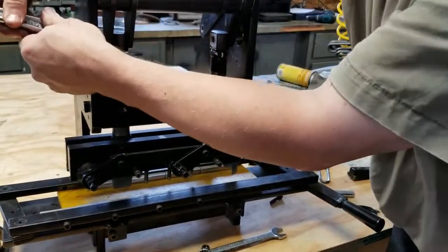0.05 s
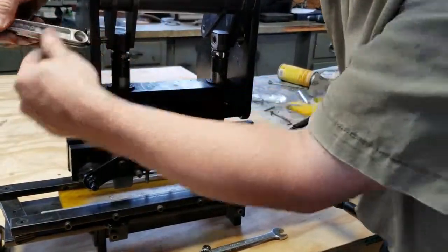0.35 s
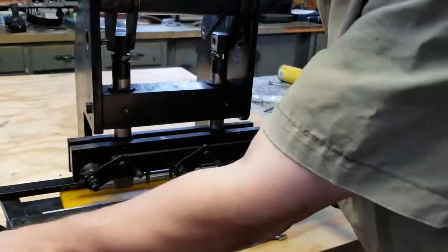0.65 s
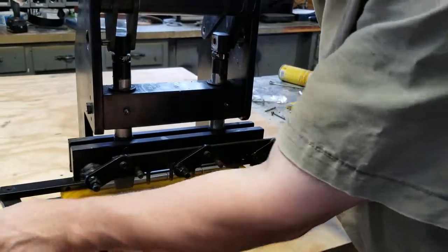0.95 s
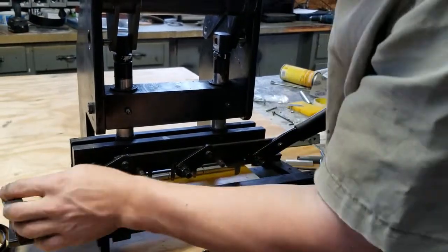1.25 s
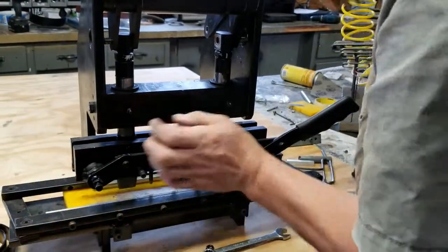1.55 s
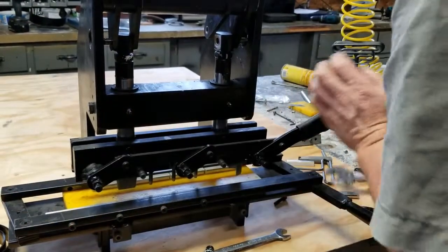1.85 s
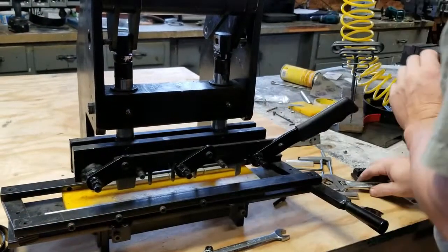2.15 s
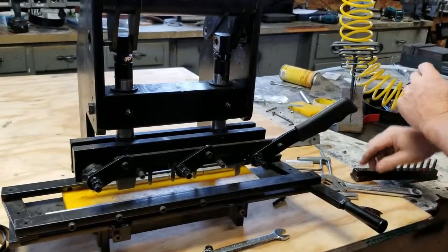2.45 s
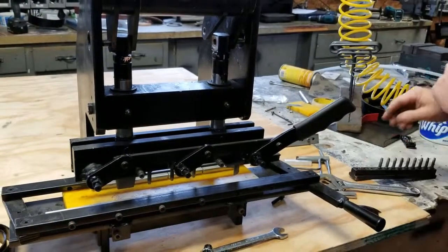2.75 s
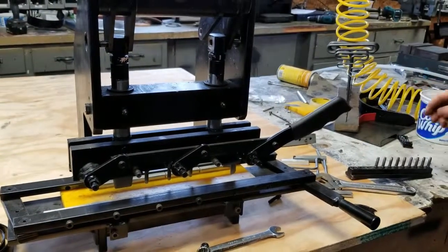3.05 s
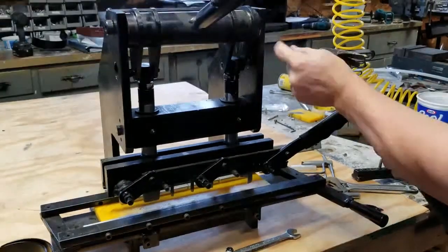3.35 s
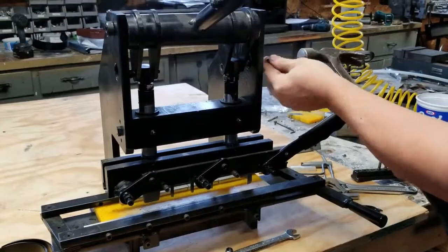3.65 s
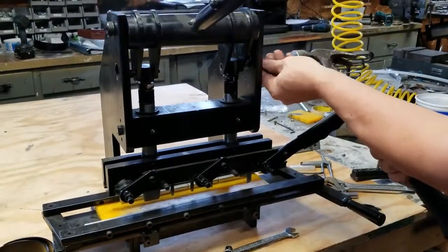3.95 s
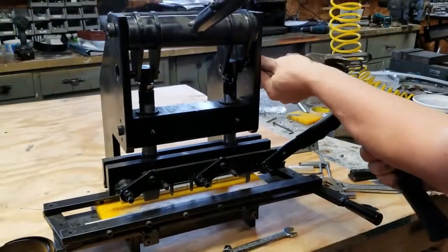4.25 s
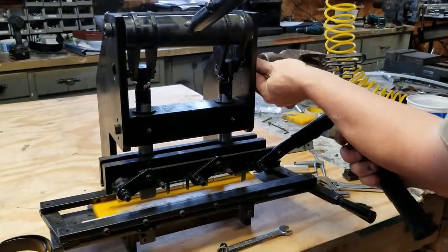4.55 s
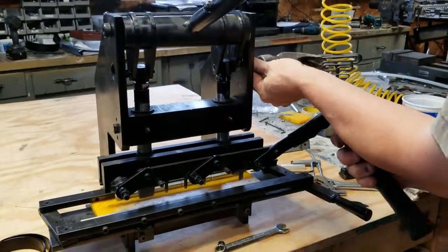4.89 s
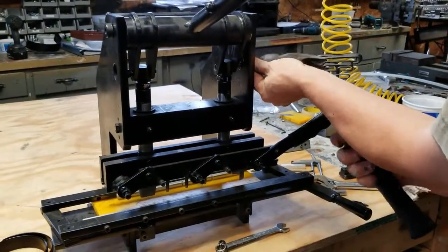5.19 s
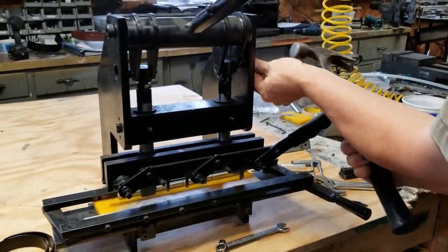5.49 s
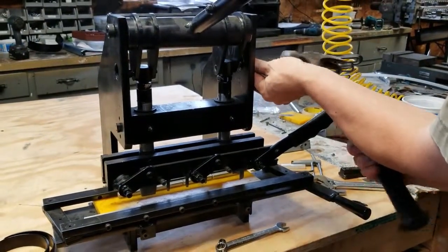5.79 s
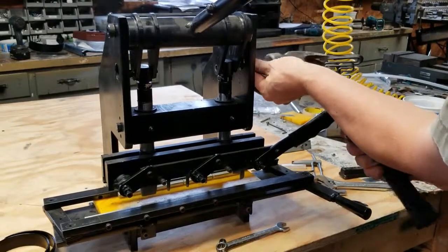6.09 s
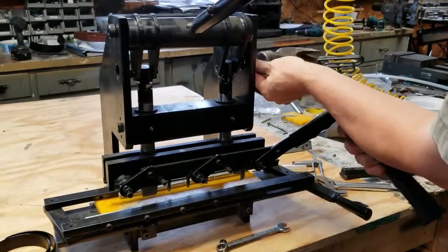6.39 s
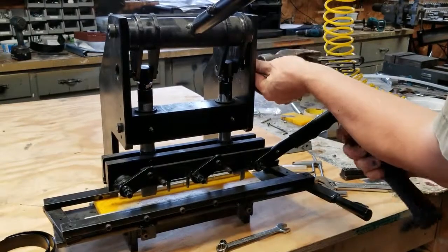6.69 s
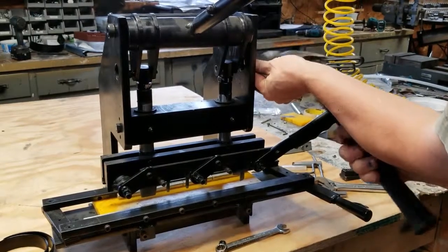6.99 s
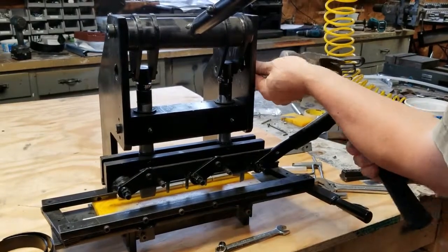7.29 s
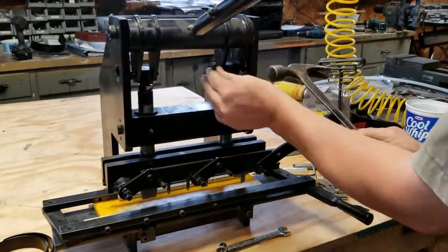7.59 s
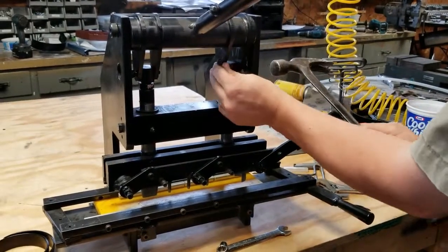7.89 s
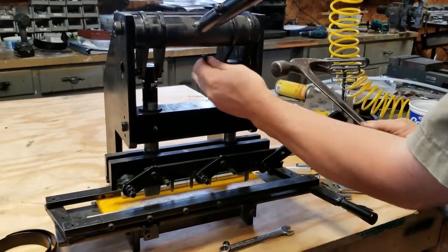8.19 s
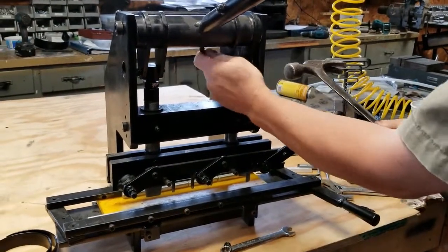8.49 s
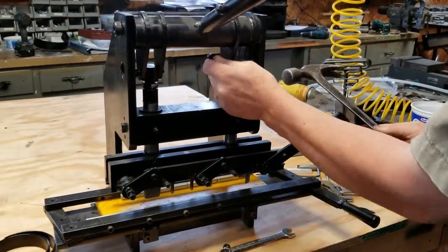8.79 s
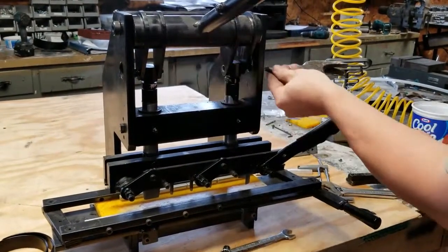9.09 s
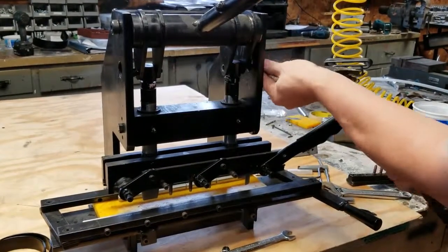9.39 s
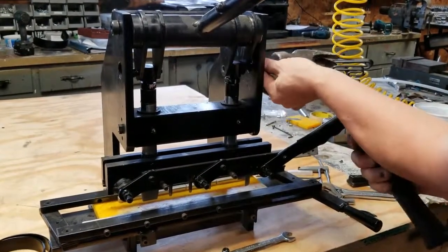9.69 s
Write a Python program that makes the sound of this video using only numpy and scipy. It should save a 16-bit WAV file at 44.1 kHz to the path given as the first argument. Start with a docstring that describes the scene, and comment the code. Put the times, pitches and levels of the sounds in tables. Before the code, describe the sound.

In a workshop with a steady low machine hum, steel tools are put down on a wooden bench with a high clink and dull knocks. A sharp click on the left is followed by a bump and a brief dropout. Then a hammer taps a pin through a steel frame about eight times, each blow ringing briefly. A few light ticks and one softer tap follow, while a faint hiss comes and goes.

```python
"""A hammer taps a pin through the frame of a steel gang punch on a wooden workbench.
Each blow rings the frame and the workshop; before the blows, tools are put down with a clink.
A machine hums behind and a hiss comes and goes. The main blows are about equally hard, but gain
control turns everything down a step with each, and recovers a second after the last.
Before the hammering, the sound clicks once on the left, then bumps and drops out for a moment."""
import sys
import numpy as np
from scipy import signal
from scipy.fft import rfft, irfft
from scipy.io import wavfile
from scipy.ndimage import uniform_filter1d

SR = 44100
rng = np.random.default_rng(int(sys.argv[2]) if len(sys.argv) > 2 else 0)


def waveform_to_disk(signal):
    """Save audio, clipped to [-1, 1], as 16-bit WAV at the path in sys.argv[1]."""
    frames = np.transpose(np.atleast_2d(signal))
    scaled = np.clip(frames, -1, 1) * 32767
    samples = np.round(scaled).astype(np.int16)
    wavfile.write(sys.argv[1], SR, samples)


N = 433944

# The hammer landing on the pin. Each row: start in seconds, level in dB, treble in dB, crack in dB,
# clank pitch in Hz, clank in dB, ring pitch in Hz, ring in dB.
HAMMER_BLOWS = [(4.543, -27.5, 2, 4, 1260, 8.5, 1330, -6), (4.550, -27.5, -5, 12.5, 3120, 15, 5860, -10),
                (4.872, -11.5, -6, 1, 1410, -8.5, 4080, -31), (4.893, -20.5, 4, 1, 1430, 10, 2520, -3),
                (5.221, -11, -0.5, 8.5, 1836, 7, 12100, -24), (5.569, -11, 4.5, -12, 4060, -2, 2530, -24),
                (5.929, -10.5, 3, 10.5, 1810, 5, 5780, -13), (6.284, -9.5, 6, 7.5, 3770, 0, 5850, -14),
                (6.653, -11.5, 13, 8.5, 1747, 3.5, 6030, -10.5),
                (7.022, -12, 8.5, 8.5, 1770, -2, 4010, -11.5), (9.739, -21, -8, 4.5, 1940, 2, 2370, -22)]
# The dense body of the steel frame. Each row: frequency in Hz, level in dB.
FRAME_BODY = [(40, -2), (130, 0), (250, 1.5), (390, 3), (620, 2.5), (950, 0), (1500, 1), (2600, 1.5),
              (3300, -6), (4200, -3.5), (5900, -14), (6700, -14), (10000, -18), (14500, -16)]
# The clear tones of the frame, then of the pin. Each row: pitch in Hz, level in dB, t60 in seconds.
FRAME_MODES = [(199, -24, 0.33), (311.4, -20, 1), (364.6, -13.5, 0.55), (414.7, -18.5, 0.59),
               (655, -27, 0.51), (1325, -13.5, 0.19), (1447, -14, 0.49), (1707, -34.5, .4),
               (1773, -22, 0.49), (2410, -32, 0.16), (2497, -22.5, 0.81), (2610, -14.5, 0.25),
               (4012, -9.5, 0.24), (4800, -28.5, 0.25), (5690, -16.5, 0.32), (5580, -23, 0.14),
               (11200, -26, .3)]
PIN_MODES = [(8370, -13, .45), (8580, -12, .45), (13480, -4, .3), (13640, -1, .34), (13800, -7, .26)]


def hammer(tick_db=3, snap_db=-1, clack_db=4, pin_free_s=6.65, pin_fall_db_per_s2=51):
    """Steel on steel ticks, snaps and clacks, and the frame rings; the pin rings most when freest."""
    out = np.zeros((2, N))
    for start, db, treble_db, crack_db, clank_hz, clank_db, ring_hz, ring_db in HAMMER_BLOWS:
        pin_db = 0.5 - pin_fall_db_per_s2 * (start - pin_free_s) ** 2
        pin = [(hz, mode_db + pin_db, t60) for hz, mode_db, t60 in PIN_MODES]
        modes = FRAME_MODES + [(ring_hz, ring_db, 0.45)] + pin
        frame = strike(FRAME_BODY, modes, treble_db, crack_db - 2, bass_db=-4.5, crack_s=0.0015,
                       body_s=0.029, room_db=-1, clank_hz=clank_hz, clank_db=clank_db)
        tick = amp(tick_db + treble_db) * snap(hz=14900, fade_s=0.0028, sharpness=3.6)
        crack = amp(snap_db + crack_db) * snap(hz=4200, fade_s=0.0017, sharpness=1.4)
        clack = amp(clack_db) * snap(hz=clank_hz, fade_s=0.0022, sharpness=22)
        add(out, start, amp(db) * frame)
        add(out, start, amp(db) * (tick + crack + clack))
    return out


def snap(hz, fade_s, sharpness, size=1024):
    """The first wave of a contact: a few milliseconds of resonance, dry and mono."""
    t, freqs = np.arange(size) / SR, np.fft.rfftfreq(size, 1 / SR)
    detune = freqs / hz - hz / (freqs + 1)
    band = irfft(rfft(rng.standard_normal(size)) / (1 + (sharpness * detune) ** 2), size)
    fade = np.exp(-t / fade_s) * (1 - np.exp(-t / 0.0002))
    return np.outer([1, 1], unit(band * fade) * np.sqrt(np.mean(fade ** 2)))


# The workshop's reverb tail. Each row: frequency in Hz, t60 in seconds.
ROOM_DECAY = [(100, 0.69), (300, 0.58), (700, 0.8), (1900, 0.58), (4800, 0.57), (12800, 0.4)]


def strike(body, modes, treble_db, crack_db, bass_db, crack_s, body_s, room_db,
           clank_hz=1000, clank_db=0, size=28672):
    """One hit: a crack, a short dense ring, the room's tail and any clear modes on top."""
    t, hz = np.arange(size) / SR, np.fft.rfftfreq(size, 1 / SR)
    band_hz, frame_s, bands = signal.stft(stereo_noise(size), SR, nperseg=256)
    room_fade = amp(-60 * frame_s / curve(ROOM_DECAY, band_hz)[:, None])
    tail = signal.istft(bands * room_fade, SR, nperseg=256)[1][:, :size]
    direct = stereo_noise(size) * np.exp(-t / body_s)
    burst = stereo_noise(size) * np.exp(-t / crack_s)
    crack = signal.lfilter([1, -1], [1, -0.88], burst)  # too short to move the bass
    # a heavy hit carries more bass, a hard contact more treble
    tilt_db = bass_db / (1 + (hz / 650) ** 2) + treble_db * (1 - 1 / (1 + (hz / 6500) ** 4))
    peak_db = clank_db / (1 + ((hz / clank_hz - 1) / 0.073) ** 2)
    tone = unit(amp(curve(body, hz) + ripple(hz))) * amp(tilt_db + peak_db)
    impact = colour(amp(crack_db) * crack + direct + amp(room_db) * tail, tone)
    attack = 1 - np.exp(-t / 0.00018)
    return (impact + ringing(modes, size)) * attack


def ripple(hz, spacing_hz=70, depth_db=4.2):
    """Many small modes: uneven peaks and dips, in dB, that differ with the spot that is hit."""
    grid = np.arange(0, SR / 2, spacing_hz)
    return depth_db * np.interp(hz, grid, rng.standard_normal(len(grid))) * hz / (hz + 2000)


def ringing(modes, size, spread=0.004, min_width_hz=7):
    """Each mode is a tight cluster of partials, so it beats and shimmers as it dies."""
    t, hz = np.arange(size) / SR, np.fft.rfftfreq(size, 1 / SR)
    noise_spectrum = rfft(stereo_noise(size))
    out = np.zeros((2, size))
    for mode_hz, db, t60 in modes:
        fade = np.exp(-np.log(1000) * t / t60)
        width_hz = min_width_hz + spread * mode_hz
        cluster = irfft(noise_spectrum / (1 + ((hz - mode_hz) / width_hz) ** 2), size)
        out += amp(db) * unit(cluster * fade) * np.sqrt(np.mean(fade ** 2))
    return out


# Tools landing. Each row: start in seconds, level in dB, treble in dB, crack in dB,
# ring pitch in Hz, ring in dB.
TOOL_CLINKS = [(1.929, -16, -2, 2.5, 12800, -17), (2.130, -30.5, 2.5, 14.5, 11690, -3),
               (2.144, -21.5, 1, 7.5, 4720, -7.5), (2.148, -31, 23.5, 0.5, 15600, -5),
               (2.158, -27.5, -0.5, -8, 11690, -3), (2.169, -42, 9, 8, 4560, -3)]
# The bright body of a tool. Each row: frequency in Hz, level in dB.
TOOL_BODY = [(60, -16), (300, -10), (600, 0.5), (1000, 2), (1800, -1), (4400, -3.5), (6200, -12.5),
             (9500, -14.5), (11000, -10), (13600, -9.5), (15600, -5.5)]
# Its clear tones. Each row: pitch in Hz, level in dB, t60 in seconds.
TOOL_MODES = [(631, -9, 0.14), (1050, -20.5, .3), (2610, -17.5, 0.42), (7700, -36, 0.37), (9600, -40, 0.2),
              (11200, -6, 0.23), (11800, -14.5, 0.3), (12600, -25, 0.42), (14040, -18, .16),
              (15550, -31, 0.17)]


def tool_clinks():
    """Steel tools are put down and ring with a high clink."""
    return hits(TOOL_CLINKS, TOOL_BODY, TOOL_MODES, ring_t60=0.51,
                bass_db=-2, crack_s=0.0045, body_s=0.024, room_db=-5)


# Thuds on the bench. Each row: start in seconds, level in dB, treble in dB, crack in dB,
# ring pitch in Hz, ring in dB.
BENCH_KNOCKS = [(.001, -46, -2, -7, 180, 16), (.215, -36.5, -4, -9, 379, 2.5), (.250, -38.5, 7, -9, 179, 5),
                (2.144, -30, -3, 2.5, 958, -1.5), (2.371, -28.5, -6, 7.5, 710, -8),
                (2.775, -39.5, -12.5, -10, 356, 3.5), (4.545, -29, -9.5, -2.5, 420, 2),
                (4.893, -26.5, -8, -7, 390, 2), (5.226, -31.5, -5, 1, 518, 0.5),
                (9.745, -30.5, -10, -5, 414.5, 1)]
# The dark body of the wood. Each row: frequency in Hz, level in dB.
BENCH_BODY = [(50, -26.5), (110, -2.5), (220, 4.5), (450, 2), (1000, -7), (2000, -11), (5000, -31),
              (15000, -26.5)]


def bench_knocks():
    """The wood knocks dully as things are put down and the punch jumps under the hammer."""
    return hits(BENCH_KNOCKS, BENCH_BODY, [], ring_t60=0.28,
                bass_db=4.5, crack_s=0.0046, body_s=0.038, room_db=-5.5)


# Small steel ticks. Each row: start in seconds, level in dB, treble in dB, crack in dB,
# ring pitch in Hz, ring in dB.
STEEL_TICKS = [(.001, -43.5, 20, -7, 7160, -4), (.004, -48.5, 2, -9, 2680, 3),
               (.107, -55, 24.5, 16, 7200, -3), (.958, -56.5, 27, 16.5, 4700, 0),
               (1.003, -54.5, 27, 17, 4640, 4), (1.291, -53, 16, 16, 4840, -10),
               (1.471, -51, 11, 11, 8450, -10), (1.630, -44, 13, 0, 12470, -10),
               (2.384, -51.5, 23, 8, 15600, 0), (3.262, -48.5, 19, -3, 13000, -13),
               (7.915, -33.5, 0.5, 17.5, 1780, -11), (8.032, -39, -2, 12, 1600, -1),
               (8.549, -43, -10, 3, 1310, -3), (8.560, -38.5, 1, 16.5, 2480, -3)]
# The thin body of a light touch. Each row: frequency in Hz, level in dB.
TICK_BODY = [(100, -25), (700, -1.5), (1300, 6.5), (2700, 3), (4500, -2.5), (7000, -15.5), (15000, -20)]


def steel_ticks():
    """Light touches of steel on steel snap and are gone."""
    return hits(STEEL_TICKS, TICK_BODY, [], ring_t60=0.35,
                bass_db=1, crack_s=0.0028, body_s=0.009, room_db=1)


def hits(rows, body, modes, ring_t60, **voicing):
    """A run of hits on one kind of object, each with a ringing mode of its own."""
    out = np.zeros((2, N))
    for start, db, treble_db, crack_db, ring_hz, ring_db in rows:
        t60 = ring_t60 * curve(ROOM_DECAY, ring_hz) / curve(ROOM_DECAY, 4000)  # highs die sooner
        hit = strike(body, modes + [(ring_hz, ring_db, t60)], treble_db, crack_db, **voicing)
        add(out, start, amp(db) * hit)
    return out


def pop(hz, width_s, db, size=1024):
    """A dry swing of pressure that lasts a cycle or two."""
    t = np.arange(size) / SR
    envelope = (t / width_s) * np.exp(1 - t / width_s)
    return amp(db) * envelope * np.sin(2 * np.pi * hz * t)


# Swells of the hiss. Each row: time when fully up in seconds, hold in seconds, level in dB.
HISS_SWELLS = [(.25, .02, -47.5), (.8, .02, -49), (1.224, .03, -48.5), (1.683, .02, -49),
               (2.68, 0.052, -44), (4.013, 1.02, -31.5), (7.15, 0.23, -33), (8.28, 0.56, -53.5),
               (8.884, 0.14, -31.5), (9.45, .04, -57)]
# Its airy colour. Each row: frequency in Hz, level in dB.
HISS_COLOUR = [(400, -32), (1200, -4.5), (2500, 1), (4500, 0), (9000, -1.5), (12500, 4), (15700, 4)]


def hiss(rest_db=-59, rise_s=0.17, fall_db_per_s=111, flutter_db=0.83):
    """A faint bright hiss; each swell rises smoothly, holds and dies away."""
    t = np.arange(N) / SR
    gain = amp(rest_db)
    for full_s, hold_s, db in HISS_SWELLS:
        rise = np.cos(np.pi / 2 * np.clip((full_s - t) / rise_s, 0, 1)) ** 2
        fall_db = fall_db_per_s * np.maximum(t - full_s - hold_s, 0)
        gain = np.hypot(gain, rise * amp(db - fall_db))
    return wash(HISS_COLOUR) * gain * amp(flutter_db * drift(rate_hz=25))


# The motor's drone. Each row: pitch in Hz, level in dB.
MOTOR_TONES = [(50, -64.5), (75.4, -59.5), (143, -53), (155.5, -50), (279.9, -46), (307.5, -49),
               (463, -55.5), (559.9, -58), (717, -62)]
# The low bed of moving air. Each row: frequency in Hz, level in dB.
AIR_COLOUR = [(15, -40.5), (25, -11), (97, -11), (149, -4), (249, -8), (285, -8.5), (416, -12),
              (463, -11.5), (516, -13), (575, -12.5), (1610, -18), (2410, -18), (6560, -36.5),
              (12500, -45.5), (16000, -50.5)]


def machine(rush_db=-41, waver_db=2.5, wander_rad=0.24):
    """A motor's tones waver in the rush of moving air."""
    t = np.arange(N) / SR
    hum = np.zeros(N)
    for hz, db in MOTOR_TONES:
        level = amp(db + waver_db * drift(rate_hz=7.7))
        phase = 2 * np.pi * (hz * t + rng.random()) + wander_rad * drift(rate_hz=0.97)
        hum += level * np.sin(phase)
    return np.sqrt(2) * hum + amp(rush_db) * wash(AIR_COLOUR)


# The stereo image. Each row: frequency in Hz, left-right correlation.
STEREO_IMAGE = [(60, 0.91), (300, 0.7), (600, 0.64), (1100, -0.076), (2200, -0.13), (4500, 0.1),
                (15000, -0.22)]


def stereo_noise(size):
    """White noise, narrow in the bass and wide in the treble."""
    left, unrelated = rfft(rng.standard_normal((2, size)))
    alike = curve(STEREO_IMAGE, np.fft.rfftfreq(size, 1 / SR))
    right = alike * left + np.sqrt(1 - alike ** 2) * unrelated
    return irfft(np.array([left, right]), size)


def wash(spectrum):
    """A steady noise bed of the given colour."""
    gain = amp(curve(spectrum, np.fft.rfftfreq(N, 1 / SR)))
    return unit(irfft(rfft(stereo_noise(N)) * gain, N))


def drift(rate_hz):
    """Slow random motion of rms 1."""
    hz = np.fft.rfftfreq(N, 1 / SR)
    return unit(irfft(rfft(rng.standard_normal(N)) * np.exp(-(hz / rate_hz) ** 2), N))


def colour(x, gain):
    """Causal EQ with a gain for every bin, so attacks stay sharp."""
    log_gain = np.log(np.maximum(gain, 1e-5))
    response = np.exp(signal.hilbert(np.r_[log_gain, log_gain[-2:0:-1]]).conj())
    return irfft(rfft(x) * response[:len(gain)])


def curve(points, hz):
    """Reads between breakpoints on a log-frequency axis."""
    point_hz, values = np.transpose(points)
    return np.interp(np.log(hz + 1), np.log(point_hz), values)


def amp(db):
    """Decibels to gain."""
    return 10 ** (np.asarray(db) / 20)


def unit(x):
    """Scales to rms 1."""
    return x / np.sqrt(np.mean(x ** 2) + 1e-20)


def pan(x, left_db):
    """Leans a sound to the left."""
    return x * amp(np.array([[left_db], [-left_db]]) / 2)


def add(mix, start_s, sound):
    """Lays a stereo sound into the mix."""
    part = mix[:, round(start_s * SR):][:, :sound.shape[1]]
    part += sound[:, :part.shape[1]]


def scene():
    """Hammer, tools and bench over the hum and hiss, with a click and a bump."""
    out = pan(hammer(), left_db=1.1)
    out += pan(machine(), left_db=2.4)
    out += pan(hiss(), left_db=1.5)
    out += steel_ticks()
    out += pan(tool_clinks(), left_db=0.5)
    out += pan(bench_knocks(), left_db=2.5)
    add(out, 2.917, np.outer([1, 0], pop(hz=3050, width_s=0.00013, db=1)))  # click, hard left
    add(out, 3.262, np.outer([1, 1], pop(hz=316, width_s=0.0011, db=-14.5)))  # bump, centre
    return out


def gain_control(x, threshold_db=-26, knee_db=2, depth_db=19, attack_s=0.47, hold_s=1.02,
                 release_s=0.16, hop=256):
    """Ducks the mix while the lows and mids are loud, holds, then recovers quickly."""
    sidechain = signal.sosfilt(signal.butter(2, 3000, fs=SR, output="sos"), x.mean(0))
    power = uniform_filter1d(sidechain ** 2, size=882)[::hop]
    power_db = 10 * np.log10(abs(power) + 1e-12)
    step_s = hop / SR
    cut_db, quiet_s, cuts = 0, 0, []
    for over in np.clip((power_db - threshold_db) / knee_db, 0, 1):
        quiet_s = 0 if over > 0 else quiet_s + step_s
        cut_db += over * (depth_db - cut_db) * step_s / attack_s
        if quiet_s > hold_s:
            cut_db *= np.exp(-step_s / release_s)
        cuts.append(cut_db)
    return x * amp(-np.interp(np.arange(N), np.arange(0, N, hop), cuts))


def dropout(x, start_s=3.275, end_s=3.402, return_db=-5.5, recover_s=0.11):
    """The sound cuts out, returns a little low and creeps back up."""
    t = np.arange(N) / SR
    recovery = (t > end_s) * amp(return_db * np.exp(-abs(t - end_s) / recover_s))
    return x * uniform_filter1d((t < start_s) + recovery, size=64)


def record(dry, ceiling=0.85, cutoff_hz=15900):
    """The master chain: gain control, soft clipping, a brief dropout and a steep high cut."""
    ducked = gain_control(dry)
    rounded = ducked / (1 + (ducked / ceiling) ** 4) ** 0.25
    high_cut = signal.firwin(401, cutoff_hz, window=("kaiser", 9), fs=SR)
    return signal.oaconvolve(dropout(rounded), high_cut[None], "same")


dry = scene()
out = record(dry)
waveform_to_disk(out)
```